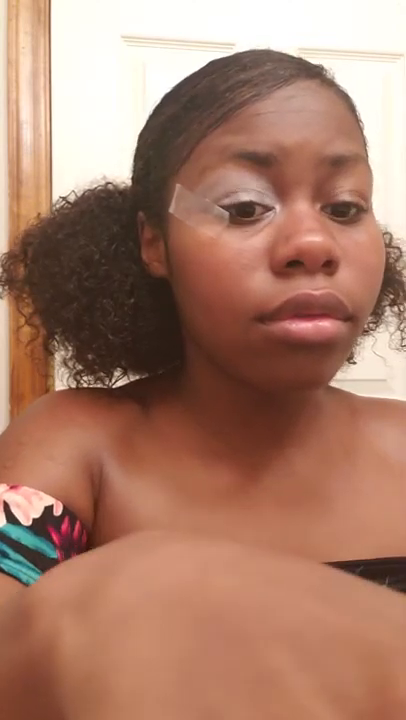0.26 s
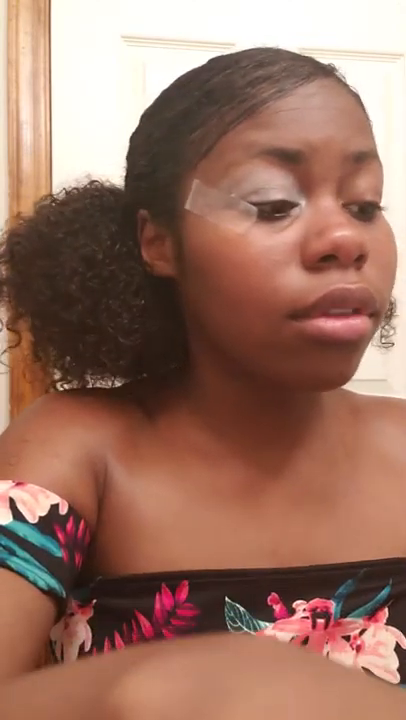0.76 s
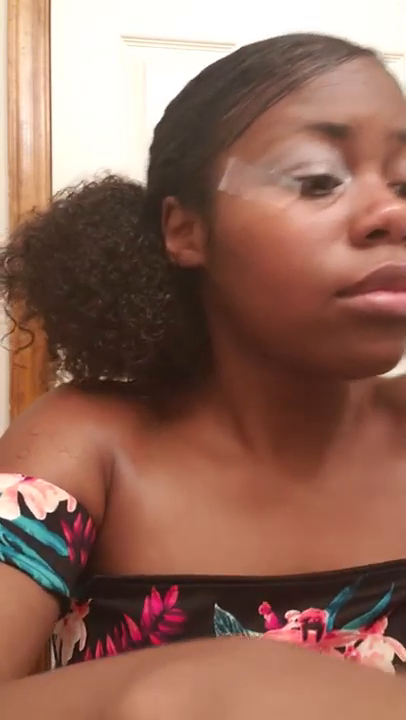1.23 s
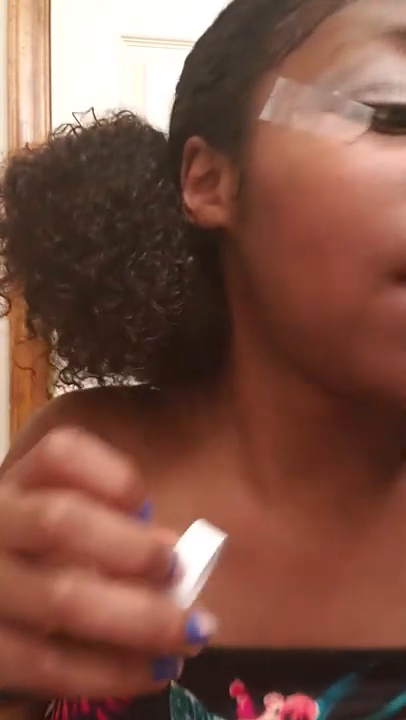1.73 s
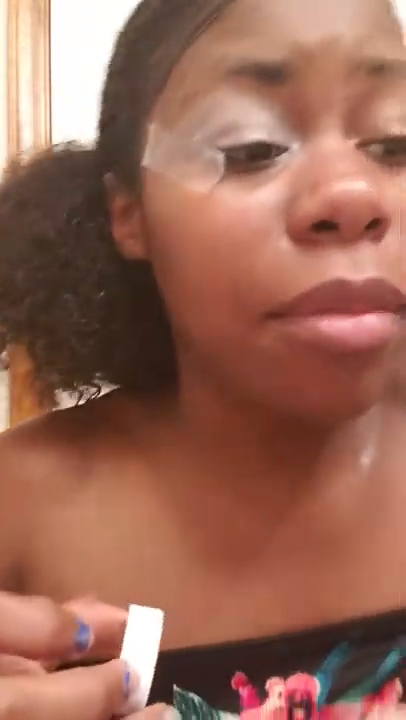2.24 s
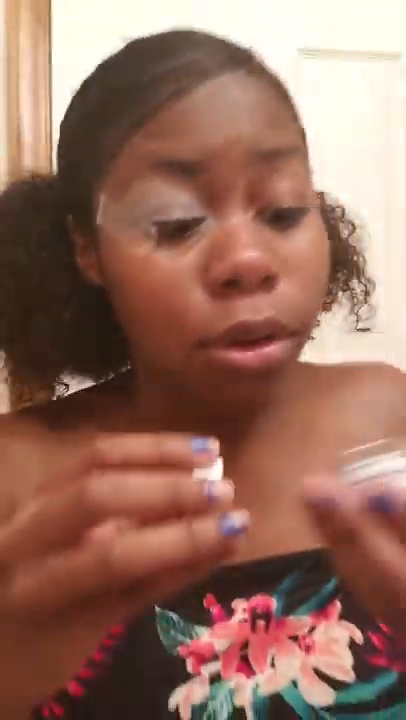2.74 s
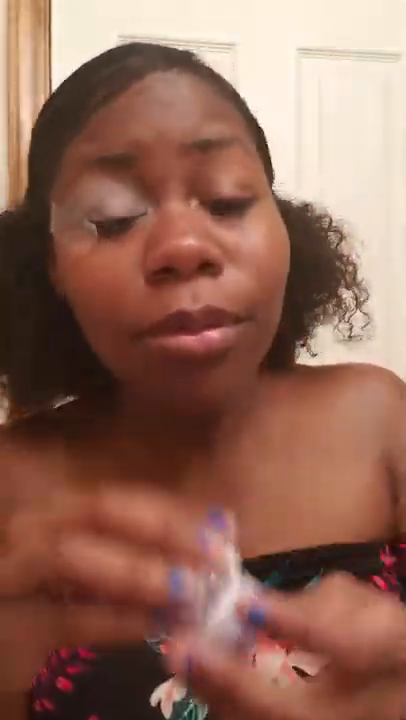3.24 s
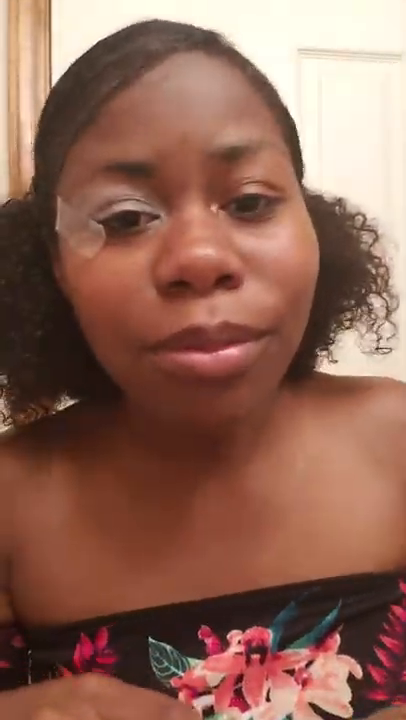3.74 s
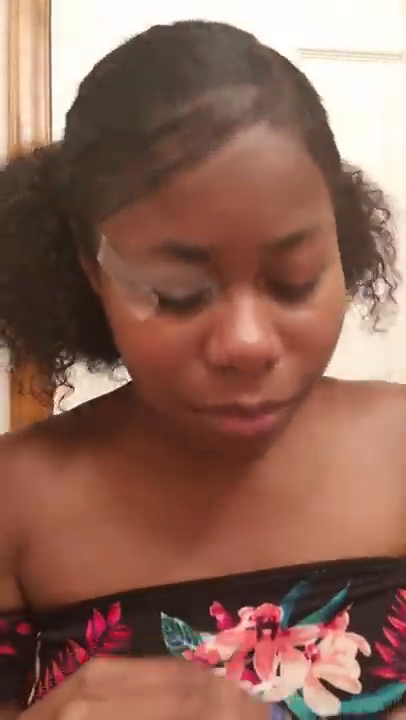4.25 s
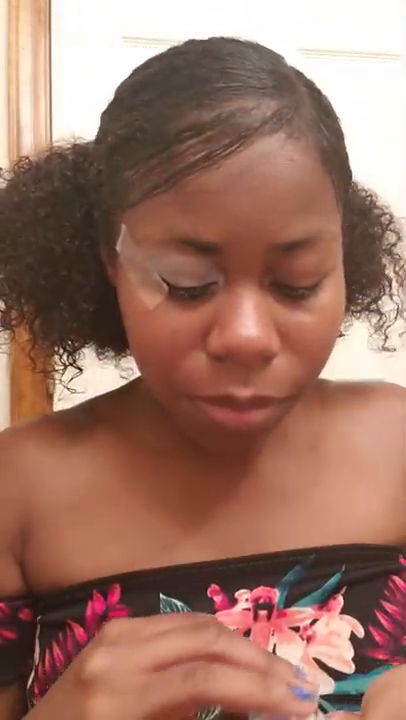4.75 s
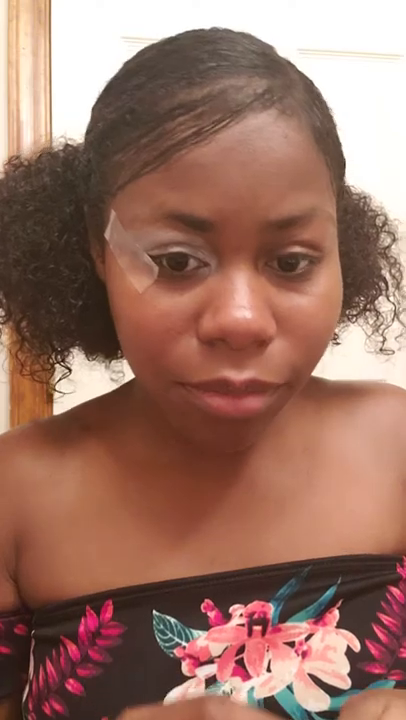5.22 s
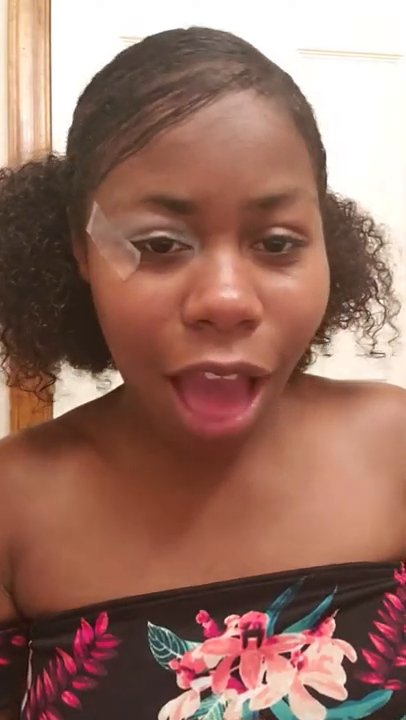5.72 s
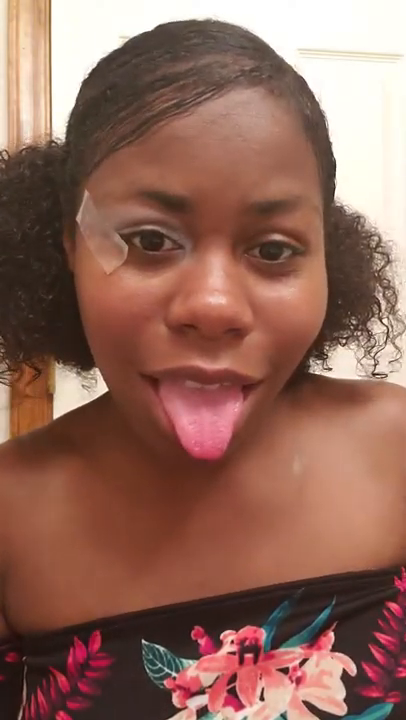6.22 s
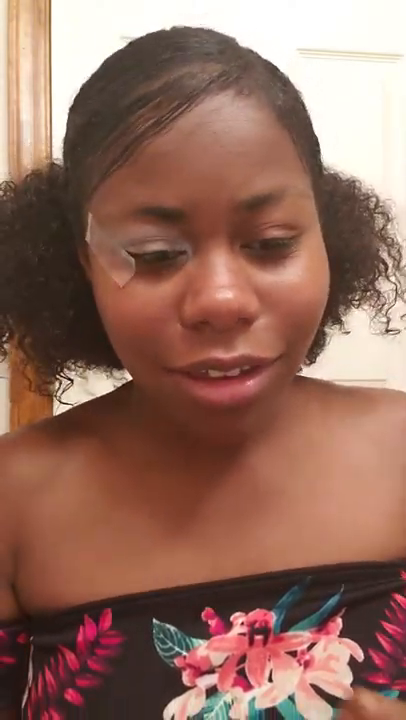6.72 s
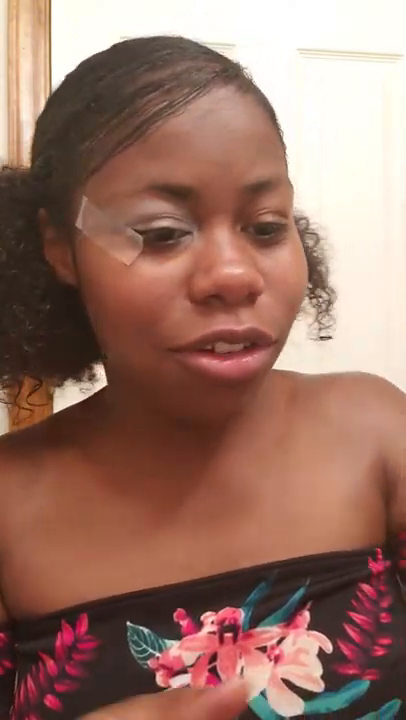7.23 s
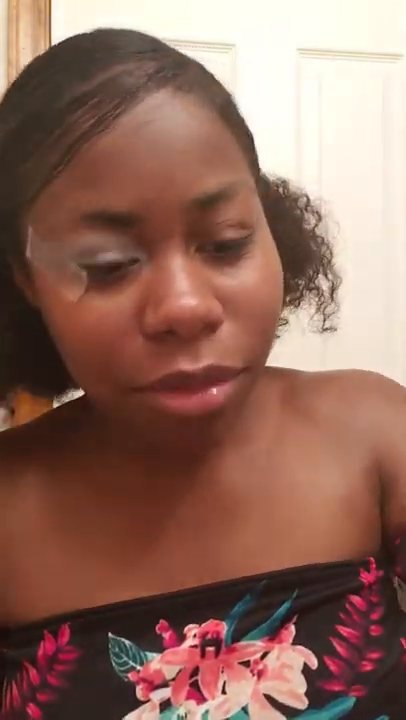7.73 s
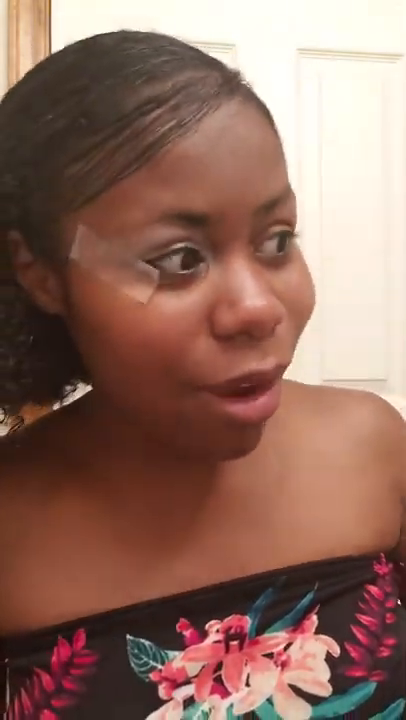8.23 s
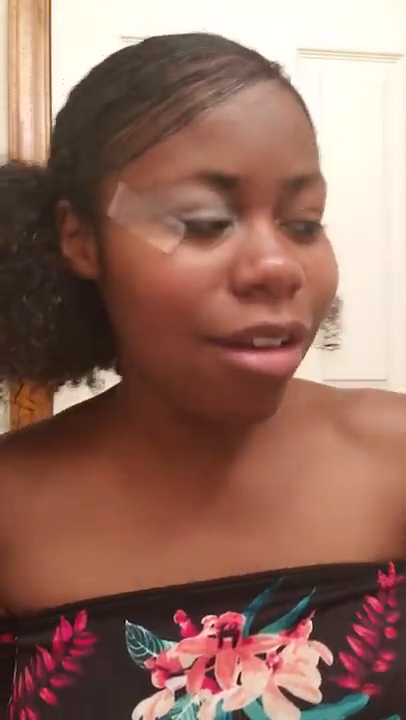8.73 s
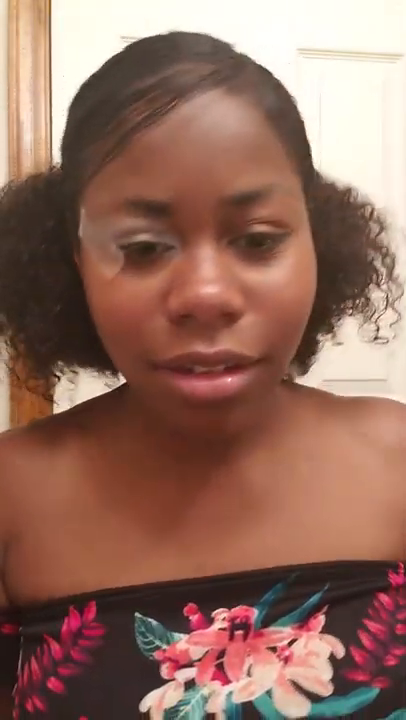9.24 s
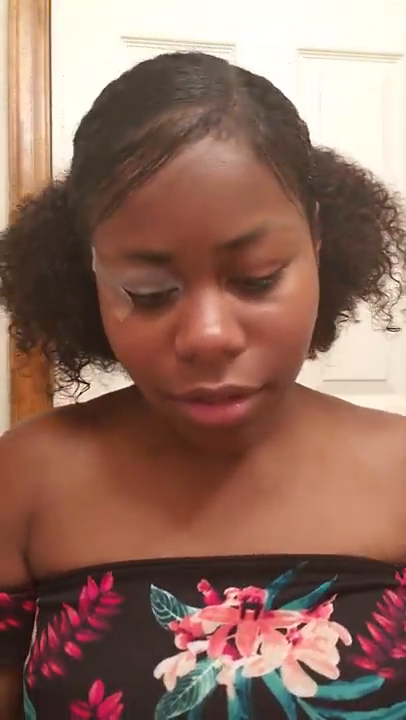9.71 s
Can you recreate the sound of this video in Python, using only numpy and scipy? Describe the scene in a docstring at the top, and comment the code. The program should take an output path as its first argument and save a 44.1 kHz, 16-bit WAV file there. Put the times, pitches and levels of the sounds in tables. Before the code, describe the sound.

A quiet bathroom-like room hums deeply while small cosmetics are handled: faint ticks, muffled counter thumps, a single bright plastic click, light rustling.

```python
"""An air unit drones through the walls of a quiet, hard-walled small room: coloured noise plus narrow hums.
Dull bumps through counter and floor are decaying modes with noise knocks. A plastic lid snaps shut once, after
a few small ticks: noise cracks, rattle contacts and a reverberant tail. Rustles and rubs are banded noise of
varying level, two faint tones are narrow noise, and each of two microphones adds steady hiss."""
import sys
import numpy as np
from scipy import signal
from scipy.fft import rfft, irfft, next_fast_len
from scipy.io import wavfile
from scipy.ndimage import uniform_filter1d, map_coordinates

SR = 44100
rng = np.random.default_rng(int(sys.argv[2]) if len(sys.argv) > 2 else 0)


def undo_db(level):
    """Turn decibels back into plain size, where 20 dB means ten times bigger."""
    steps = np.asarray(level, float) / 20
    return 10 ** steps


def waveform_to_disk(signal):
    """Save audio, clipped to [-1, 1], as 16-bit WAV at the path in sys.argv[1]."""
    frames = np.transpose(np.atleast_2d(signal))
    scaled = np.clip(frames, -1, 1) * 32767
    samples = np.round(scaled).astype(np.int16)
    wavfile.write(sys.argv[1], SR, samples)


N = 439677  # samples

# Air unit rumble spectrum: (frequency [Hz], relative density [dB per Hz])
RUMBLE_SPECTRUM = [(13, -50), (22, -10.5), (59, -2), (76, -2.5), (92, -8.5), (124, -12), (156, -9.5),
                   (187, -17.5), (204, -30), (239, -18.5), (270, -27.5), (328, -29.5), (484, -39),
                   (558, -47), (1500, -63), (1950, -84.5), (3300, -120)]
# Narrow wavering hums: (frequency [Hz], full width at -6 dB [Hz], rms before port lean [dB])
HUMS = [(66.24, 7.4, -53), (121, 17.4, -54), (179.4, 15, -63.5), (239.4, 7.3, -69), (329.3, 5.4, -75),
        (471.4, 13, -88), (693, 5.3, -93), (779, 6.9, -97)]
# Counter blows: (time [s], level before spread [dB], favoured pitch [Hz], knock re blow [dB], edge re blow [dB])
BUMPS = [(2.432, -38, 78, -23, -53), (3.28, -41, 100, -7, -27), (3.318, -39.5, 78, -6, -29.5),
         (5.17, -33.5, 139, -13, -54), (5.648, -35.5, 180, -22.5, -47), (5.728, -35, 180, -11.5, -50),
         (5.8, -36, 59, -7, -47), (5.84, -43.5, 108, -7.5, -22.5), (6.193, -32.5, 142, -13.5, -50),
         (6.277, -23, 75.6, -22, -44), (6.32, -32, 77.6, -12.5, -42), (6.702, -28, 139.7, -13.5, -38.5),
         (6.726, -30.5, 175, -14.5, -43.5), (6.785, -27.5, 121, -13.5, -40),
         (6.808, -23, 137.3, -25.5, -53.5), (6.857, -37.5, 133.4, -27, -50), (7.21, -25, 138, -27.5, -53),
         (7.255, -33.5, 77.5, -26, -54), (8.157, -38.5, 177.3, -20, -64), (8.181, -30.5, 79.6, -23.5, -50)]
# Low modes of the counter: (frequency [Hz], t60 [s])
COUNTER_MODES = [(59, .14), (78, 0.14), (104, 0.2), (121, 0.092), (138, .17), (180, 0.22)]
# Dull knock spectrum: (frequency [Hz], relative density [dB per Hz])
KNOCK_SPECTRUM = [(120, -21.5), (200, 2), (260, 4), (340, -3), (430, -8.5), (510, -10), (600, -32.5),
                  (800, -36)]
# Brighter edge spectrum: (frequency [Hz], relative density [dB per Hz])
EDGE_SPECTRUM = [(450, -13.5), (650, 7.5), (950, -10), (1300, -22.5)]
# Plastic ticks: (time [s], level [dB], treble lift [dB per octave], crack re tick [dB], left over right [dB])
TICKS = [(2.308, -55.5, 18.5, 6, 6), (3.1687, -63, 17, -8, 7), (3.172, -57.5, -11.5, -11, 1),
         (5.829, -28.5, -3, -4.5, 2.5)]
# Plastic spectrum before lift: (frequency [Hz], relative density [dB per Hz])
PLASTIC_SPECTRUM = [(700, -22.5), (1300, -13), (1750, -14), (2050, -8.5), (2400, -1), (2750, 1), (3300, -2),
                    (4100, -4.5), (4800, -6.5), (6000, -4.5), (7200, -5), (8300, -18.5), (11500, -10.5),
                    (15600, -34.5)]
# Room decay: (frequency [Hz], t60 [s])
ROOM_T60 = [(300, 0.54), (1200, 0.31), (1900, 0.35), (2500, 0.35), (3500, 0.33), (6500, 0.35),
            (10000, 0.28), (15000, 0.48)]
# Lid rattle contacts after the first crack: (delay [s], level re tick [dB])
LID_RATTLE = [(0.0105, -9.5), (0.02, -11), (.031, -17), (.049, -11.5)]
# Soft hiss near 7 kHz: (time [s], level before flicker and lean [dB])
RUSTLE_LEVEL = [(0.0, -88.5), (0.4, -82), (0.56, -90.5), (1.02, -82.5), (1.5, -88.5), (1.95, -91.5),
                (2.2, -84.5), (3.0, -88), (3.2, -80), (3.68, -85.5), (3.74, -87.5), (3.95, -81.5),
                (4.38, -80.5), (4.52, -87.5), (4.95, -83.5), (5.0, -82), (5.7, -83), (6.2, -84.5),
                (6.7, -89.5), (7.4, -89.5), (8.55, -94.5), (8.8, -79), (9.05, -77), (9.17, -81.5),
                (9.43, -84), (9.5, -80), (9.8, -87), (9.97, -90)]
# Soft hiss spectrum: (frequency [Hz], relative density [dB per Hz])
RUSTLE_SPECTRUM = [(4500, -14.5), (5800, 0.5), (7000, 7), (7800, 1), (8300, -11), (10500, -21.5),
                   (12500, -15), (15500, -32)]
# Coarse rubs: (peak time [s], peak level before flicker and gain [dB], 20 dB rise [s], 20 dB fall [s])
RUBS = [(1.3, -98, .2, .3), (3.17, -80.5, .02, 0.17), (3.32, -88, .05, 0.27), (7.75, -93, 0.196, 0.26),
        (8.85, -87, 0.24, 0.3), (9.75, -88, 0.6, 0.33)]
# Coarse rub spectrum: (frequency [Hz], relative density [dB per Hz])
RUB_SPECTRUM = [(600, -12.5), (1000, -0.5), (1700, -1), (2600, -1), (3800, -4.5), (5000, -9.5),
                (7000, -15.5)]
# Faint brief tones: (start [s], end [s], frequency [Hz], level before swell and lean [dB])
FAINT_TONES = [(3.913, 4.212, 468, -74.5), (4.265, 4.54, 492, -69)]
# Microphone hiss spectrum: (frequency [Hz], relative density [dB per Hz])
HISS_SPECTRUM = [(410, -34.5), (700, -3), (747, -8.5), (920, -10), (1340, -10), (2110, -12), (2630, -12.5),
                 (3000, -14), (4260, -15), (5380, -16.5), (8160, -25), (12100, -6.5), (15600, -6.5)]
# Stereo likeness: (frequency [Hz], left-right correlation [-1 to 1])
LIKENESS = [(60, 0.99), (180, 0.85), (550, 0.63), (1650, 0.78), (4970, 0.95), (15000, 0.01)]
# Stereo lean: (frequency [Hz], left over right [dB])
PORT_LEAN = [(60, 2), (130, 3), (290, 3), (1000, 0)]

LEFT_LEAD_SAMPLES = 6


def unit(x):
    """Scale to rms 1 over all channels."""
    return x / np.sqrt(np.mean(x ** 2) + 1e-20)


def along(points, hz):
    """Interpolate (frequency, value) points on a log frequency axis."""
    point_hz, values = np.transpose(points)
    return np.interp(np.log(hz + 1), np.log(point_hz + 1), values)


def closed(points):
    """Gain of a spectrum that is silent outside its ends."""
    return lambda hz: undo_db(along(points, hz)) * (hz > points[0][0]) * (hz < points[-1][0])


def wobble(knots_per_s):
    """Smooth random curve through normal knots."""
    knots = rng.standard_normal(int(N * knots_per_s / SR) + 4)
    return map_coordinates(knots, [np.arange(N) * knots_per_s / SR])


def filtered(x, response):
    """Multiply the spectrum of x by a response of frequency."""
    n = x.shape[-1]
    padded = next_fast_len(n + 8192)
    return irfft(rfft(x, padded) * response(np.fft.rfftfreq(padded, 1 / SR)), padded)[..., :n]


def noise(response, size=N):
    """Two unrelated coloured noises of joint rms 1."""
    return unit(filtered(rng.standard_normal((2, size)), response))


def spread(pair):
    """Mix a mid/side pair to left and right by likeness, lean and lead per frequency."""
    def mid_side_gain(hz):
        angle = np.arccos(np.clip(along(LIKENESS, hz), -1, 1)) / 2
        return np.array([np.cos(angle), np.sin(angle)])

    def port_gain(hz):
        left = undo_db(along(PORT_LEAN, hz) / 2) * np.exp(1j * np.pi * hz * LEFT_LEAD_SAMPLES / SR)
        return np.array([left, 1 / left])

    mid, side = filtered(pair, mid_side_gain)
    return filtered(np.array([mid + side, mid - side]), port_gain)


def air_unit():
    """Broad drifting rumble with narrow hums where the room and ducts resonate."""
    rumble_db = -48.5 + 1.5 * wobble(1.5) + 2.4 * wobble(5)
    rumble = undo_db(rumble_db) * noise(closed(RUMBLE_SPECTRUM))
    hums = sum(undo_db(db) * noise(lambda f: 1 / (1 + (2 * (f - hz) / width_hz) ** 2))
               for hz, width_hz, db in HUMS)
    return spread(rumble + hums)


def bumps():
    """Soft blows ring the counter, mostly one low mode; knock and edge noises die away in the room."""
    push_s, blur_rise_s, knock_rise_s = 0.004, 0.011, 0.0063  # time constants
    blur_t60_s, knock_t60_s = 0.64, 0.5
    off_pitch_db_per_octave = -68.5
    blur_db = -11  # before its rise
    out = np.zeros((2, N + SR))
    t = np.arange(SR // 2) / SR
    for s, db, hz, knock_db, edge_db in BUMPS:
        modes = sum(np.sin(2 * np.pi * f * t)
                    * undo_db(off_pitch_db_per_octave * abs(np.log2(f / hz)) - 60 * t / t60)
                    for f, t60 in COUNTER_MODES)
        ring = -modes * (1 - np.exp(-t / push_s)) ** 2
        # neighbouring modes blur the note
        blur = noise(lambda f: 1 / (1 + ((f - hz) / 45) ** 2) ** 2, size=len(t))
        blur = blur * undo_db(blur_db - 60 * t / blur_t60_s) * (1 - np.exp(-t / blur_rise_s))
        knock = undo_db(knock_db - 60 * t / knock_t60_s) * noise(closed(KNOCK_SPECTRUM), size=len(t))
        edge = undo_db(edge_db - 60 * t / knock_t60_s) * noise(closed(EDGE_SPECTRUM), size=len(t))
        impact = (knock + edge) * (1 - np.exp(-t / knock_rise_s)) ** 2
        blow = ring * [[1.3], [0.2]] + blur + impact  # rows: mid, side
        out[:, round(s * SR):][:, :len(t)] += undo_db(db) * blow
    return spread(out[:, :N] * [[1], [0.6]])  # nearer than the drone, so more alike on both sides


def plastic_tail(colour, hz, frames, z, size):
    """The walls' answer, rms 1: each frequency builds and dies at its own speed."""
    fade = undo_db(-60 * frames / along(ROOM_T60, hz)[:, None])
    rise_s = 0.005 + 0.01 * hz[:, None] / 12000  # the treble gathers more slowly
    build = 1 - np.exp(-(frames + 0.002) / rise_s)
    # uneven echoes
    lumps = undo_db(2.5 * unit(uniform_filter1d(rng.standard_normal(z.shape), size=12, axis=1)))
    shaped = z * colour[:, None] * fade * build * lumps
    return unit(signal.istft(shaped, SR, nperseg=256)[1][:, :size])


def ticks():
    """A short plastic crack and its rattle contacts, noise bursts, over a reverberant tail."""
    burst_t60_s, tail_db, tail_rise_s = 0.019, -23.0, 0.0021
    out = np.zeros((2, N + SR))
    t = np.arange(SR // 2 + 128) / SR
    for s, db, lift_db, crack_db, pan_db in TICKS:
        hz, frames, z = signal.stft(rng.standard_normal((2, len(t))), SR, nperseg=256)
        colour = undo_db(along(PLASTIC_SPECTRUM, hz) + lift_db * np.log2(hz / 3000 + 0.097))
        colour = colour / np.sqrt(np.mean(colour ** 2))
        tail = plastic_tail(colour, hz, frames, z, len(t))
        tail = undo_db(tail_db) * tail * (1 - np.exp(-t / tail_rise_s))
        bursts = sum(undo_db(level_db - 60 * np.abs(t - delay_s) / burst_t60_s) * (t >= delay_s)
                     for delay_s, level_db in [(0, crack_db), *LID_RATTLE])
        dulled = lambda f: np.interp(f, hz, colour) / (1 + (f / 7000) ** 4)
        contacts = filtered(rng.standard_normal((2, len(t))), dulled) * bursts
        gain = undo_db(db + pan_db / 2 * np.array([[1], [-1]]))
        out[:, round(s * SR):][:, :len(t)] += gain * (tail + contacts)
    return out[:, :N]


def rustle():
    """Soft hiss, louder on the left port; the fainter it is, the more it flickers."""
    flicker_below_db, flicker_db_per_db = -83, 0.41
    t = np.arange(N) / SR
    level_db = np.interp(t, *np.transpose(RUSTLE_LEVEL))
    faint_db = np.clip(flicker_below_db - level_db, 0, None)
    level_db = level_db + flicker_db_per_db * faint_db * wobble(10) + 1.5 * wobble(25)
    return undo_db(level_db) * noise(closed(RUSTLE_SPECTRUM)) * undo_db([[4.5], [-4.5]])


def rubs():
    """Coarse noise with a steady floor; each rub rises and falls linearly in dB."""
    floor_db = -92.5  # before flicker and port gains
    t = np.arange(N) / SR
    level = undo_db(floor_db) + sum(undo_db(db - 20 * np.maximum((s - t) / rise_s, (t - s) / fall_s))
                                for s, db, rise_s, fall_s in RUBS)
    return level * undo_db(1.0 * wobble(11)) * noise(closed(RUB_SPECTRUM)) * undo_db([[3.5], [2.5]])


def faint_tones():
    """Two faint, slightly unsteady tones, narrow noise under half-sine swells."""
    t = np.arange(N) / SR
    swell = lambda start, end: np.sin(np.pi * np.clip((t - start) / (end - start), 0, 1))
    tone = lambda hz: noise(lambda f: 1 / (1 + ((f - hz) / 6) ** 2))
    return spread(sum(undo_db(db) * swell(start, end) * tone(hz) for start, end, hz, db in FAINT_TONES))


def microphone_hiss():
    """Steady coloured noise, unrelated in the two microphones."""
    return undo_db(-78) * noise(closed(HISS_SPECTRUM)) * undo_db([[-0.4], [0.4]])


def scene():
    """Sum all sources in the room."""
    return air_unit() + bumps() + ticks() + rustle() + rubs() + faint_tones()


def band_limit(x):
    """A steep low-pass at the top of the band."""
    return signal.sosfilt(signal.butter(12, 15780, fs=SR, output="sos"), x)


def record(dry):
    """Add each microphone's hiss; the ports lose the deepest bass, below about 30 Hz."""
    mics = filtered(dry + microphone_hiss(), lambda hz: hz ** 4 / (hz ** 4 + 30 ** 4))
    return band_limit(mics)


dry = scene()
out = record(dry)
waveform_to_disk(out)
```